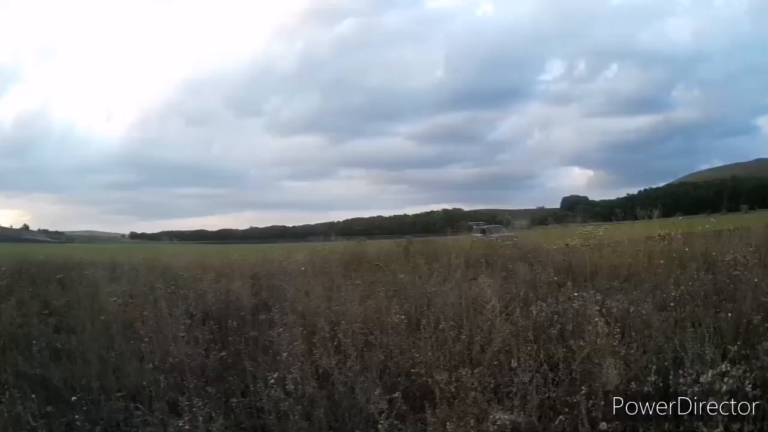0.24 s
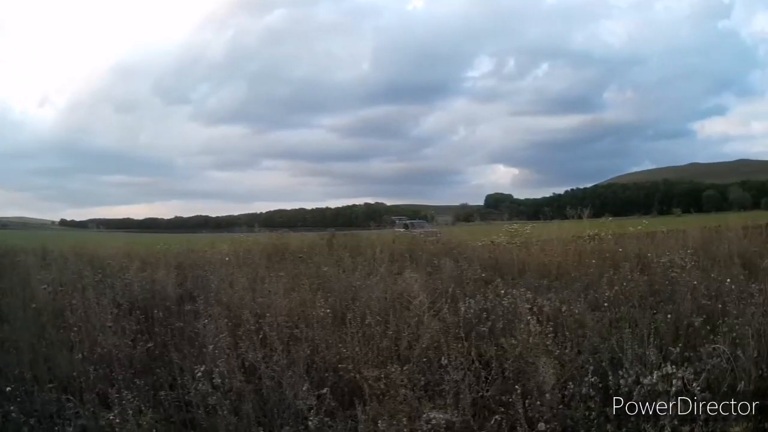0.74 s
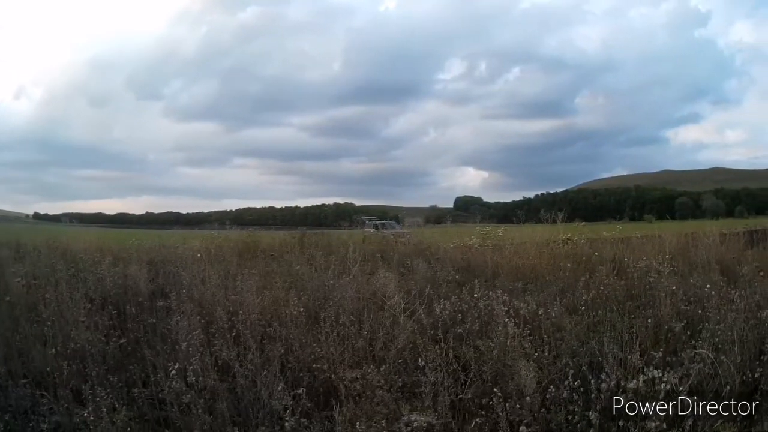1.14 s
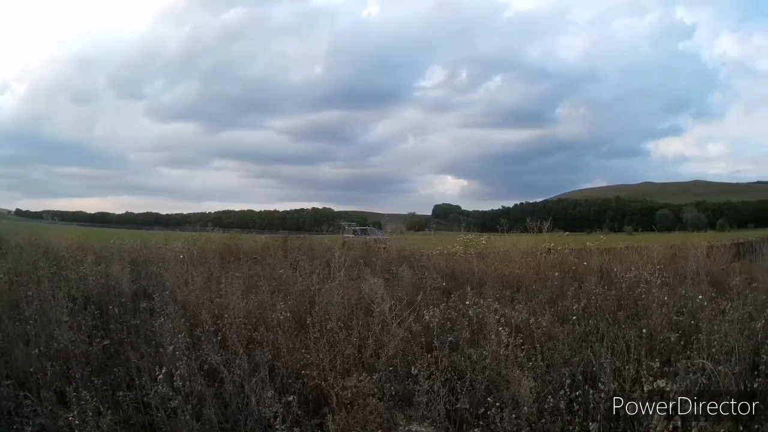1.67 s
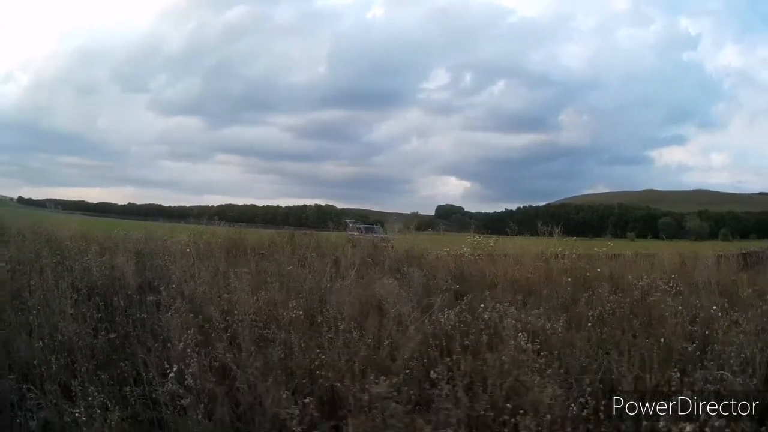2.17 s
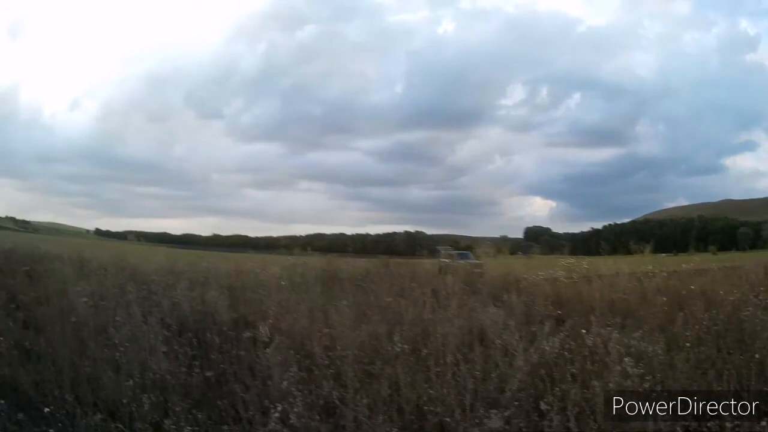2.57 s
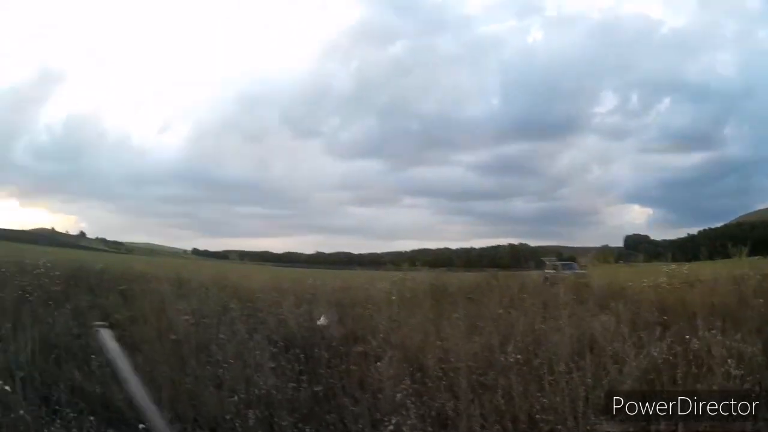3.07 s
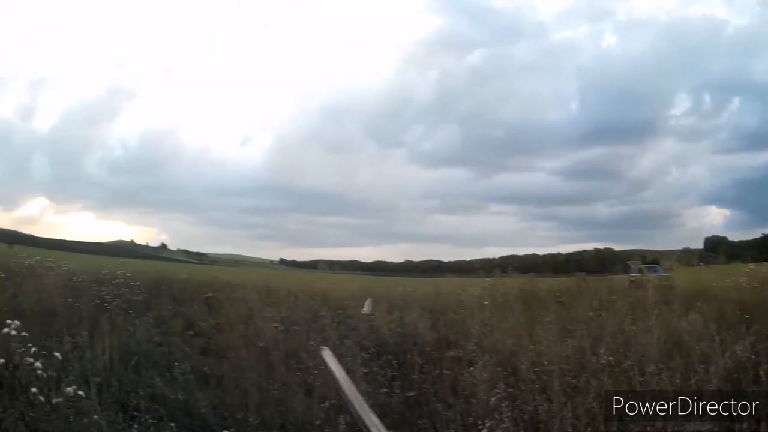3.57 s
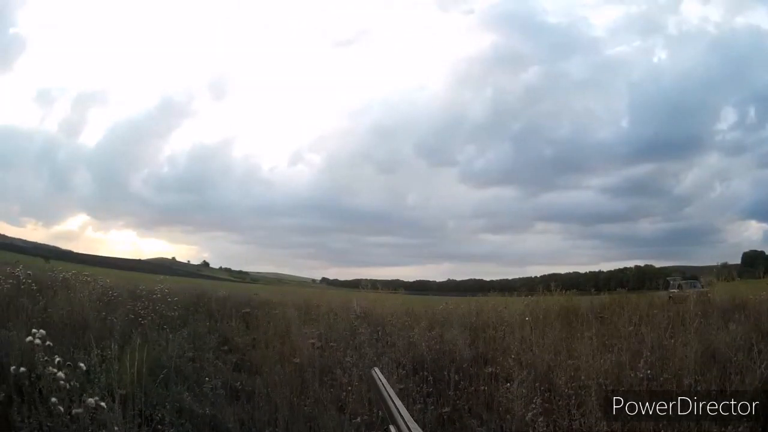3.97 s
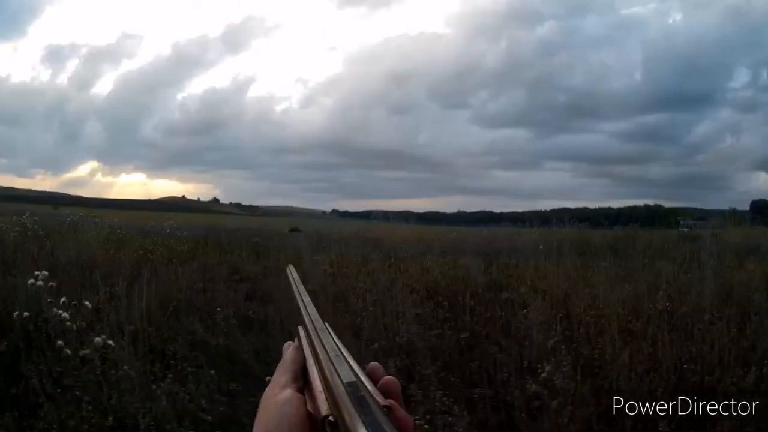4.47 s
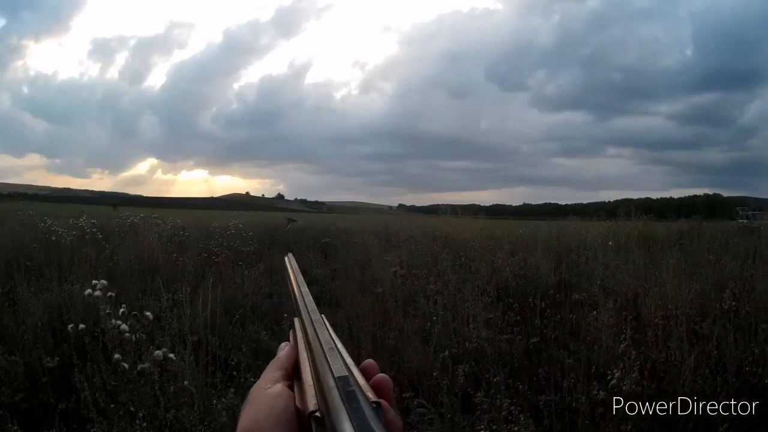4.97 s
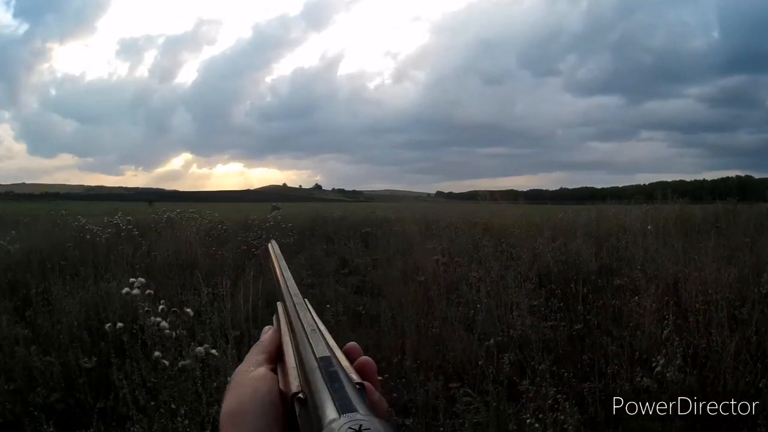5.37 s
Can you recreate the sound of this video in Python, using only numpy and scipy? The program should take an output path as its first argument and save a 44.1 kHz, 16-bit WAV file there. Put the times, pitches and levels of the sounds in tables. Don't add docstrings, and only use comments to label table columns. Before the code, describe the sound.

Muffled wind booms inside a sealed camera case in a meadow, with small strap ticks, cloth rubs and blunt knocks as a gun is raised.

```python
import sys
import numpy as np
from scipy import signal
from scipy.fft import rfft, irfft
from scipy.io import wavfile
from scipy.ndimage import uniform_filter1d, map_coordinates

SR = 44100
rng = np.random.default_rng(int(sys.argv[2]) if len(sys.argv) > 2 else 0)


def digitize_waveform(pressure):
    field = np.atleast_2d(pressure).T
    bounded = np.clip(field, -1, 1)
    quanta = np.round(bounded * 32767).astype(np.int16)
    wavfile.write(sys.argv[1], SR, quanta)


def ratio_of_db(decibels):
    return 10 ** (np.asarray(decibels, float) / 20)


N = 247842
TIME_S = np.arange(N) / SR
FFT_LEN = 6 * SR


def unit(x):
    return x / np.sqrt(np.mean(x ** 2) + 1e-20)


def along(points, hz):
    point_hz, gain_db = np.transpose(points)
    return ratio_of_db(np.interp(np.log(hz + 1), np.log(point_hz + 1), gain_db))


def curves(rows):
    at_s, *columns = np.transpose(rows)
    return [np.interp(TIME_S, at_s, column) for column in columns]


def wobble(rate_hz):
    knots = rng.standard_normal(int(N * rate_hz / SR) + 4)
    return map_coordinates(knots, [np.arange(N) * rate_hz / SR])


def bumps(rows, width_s):
    return sum(height * np.exp(-.5 * ((TIME_S - s) / width_s) ** 2) for s, height in rows)


def filtered(x, response):
    return irfft(rfft(x, FFT_LEN) * response(np.fft.rfftfreq(FFT_LEN, 1 / SR)), FFT_LEN)[:N]


def modes(table):
    def response(f):
        total = 0
        for k, (hz, width_hz, db) in enumerate(table):
            damping = 1j * f * width_hz
            total = total + (-1) ** k * ratio_of_db(db) * damping / (hz * hz - f * f + damping)
        return total
    return response


def noise(spectrum):
    return unit(filtered(rng.standard_normal(N), lambda hz: along(spectrum, hz)))


def scuffs(rate_hz, spread_db, smooth):
    hit, size, sign = rng.random((3, N))
    size_gain = ratio_of_db(-spread_db * np.log(size + 0.00049))
    grains = (hit < rate_hz / SR) * size_gain * np.sign(sign - .5)
    return unit(grains) + smooth * rng.standard_normal(N)


def evened(x, span_s, share):
    span = int(span_s * SR)
    power = np.abs(uniform_filter1d(uniform_filter1d(x ** 2, span), span)) + 1e-20
    return unit(x / power ** (np.clip(share, 0, 1) / 2))


# freq_hz, density_db_per_hz
OPEN_AIR_SPECTRUM = [(15, -40), (45, -15), (150, -9), (250, -7), (460, -5), (600, -4.5), (715, -3.5),
                     (850, -4), (1250, -6), (1780, -15), (1980, -26), (2300, -22.5), (6000, -38.5),
                     (11500, -41), (15700, -48.5)]
# time_s, level_db
GRASS_LEVEL = [(0.0, -43), (0.036, -40.5), (0.14, -44.5), (0.15, -39.5), (0.166, -44), (0.188, -40.5),
               (0.206, -46), (0.215, -38.5)]
# start_s, level_db, pitch_hz
STALK_SNAPS = [
    (.097, -72, 4500),
    (0.129, -47, 4300),
    (0.059, -57, 9230),
]
# freq_hz, width_hz, level_db
INSECT_SONG = [(11830, 82, -84.5)]


def open_air():
    air = ratio_of_db(curves(GRASS_LEVEL)[0] + wobble(110)) * noise(OPEN_AIR_SPECTRUM)
    for hz, width_hz, db in INSECT_SONG:
        song = unit(filtered(rng.standard_normal(N), modes([(hz, width_hz, 0)])))
        air += ratio_of_db(db + 3.2 * wobble(39)) * song
    for start_s, db, hz in STALK_SNAPS:
        t = np.maximum(TIME_S - start_s, 0)
        rough_phase = 0.51 * rng.standard_normal(N)
        air += ratio_of_db(db - 60 * t / 0.015) * np.sin(2 * np.pi * hz * t + rough_phase) * (t > 0)
    return air


# time_s, drag_db, dryness_db
HANDLING_CURVE = [(0.22, -65.5, 7), (0.6, -61.5, 3.5), (1.2, -64.5, 3.5), (1.92, -60.5, -4.5),
                  (2.2, -65, 1), (2.45, -60, 3), (2.74, -60, 0.5), (2.83, -55.5, -3), (2.99, -51.5, -6.5),
                  (3.26, -57.5, -3), (3.42, -53.5, 0), (3.55, -49.5, -7), (3.63, -53.5, 4),
                  (3.74, -54.5, 3), (3.82, -62, 4.5), (4.4, -62.5, 3), (5.06, -72.5, 10.5),
                  (5.62, -65, 9.5)]
REST_DB = -60


def handling():
    drag_db, dry_db = curves(HANDLING_CURVE)
    return drag_db - REST_DB, dry_db


# freq_hz, density_db_per_hz
HISS_SPECTRUM = [(400, -18.5), (700, -10), (1000, -6.5), (1600, -8), (2500, -11), (3300, -11), (3800, -13),
                 (4000, -16.5)]
# freq_hz, level_db
WHINE_TONES = [(2977, -88)]
HISS_DB, HISS_DB_PER_CLOTH_DB = -65.5, .25


def electronics():
    whine = 0
    for hz, db in WHINE_TONES:
        whine = whine + ratio_of_db(db + 3) * np.sin(2 * np.pi * hz * TIME_S + 1.2 * wobble(20))
    drag_db, dry_db = handling()
    cloth_db = HISS_DB_PER_CLOTH_DB * np.maximum(drag_db + 1.5 * dry_db + 0.5, 0)
    return ratio_of_db(HISS_DB + cloth_db + 0.69 * wobble(40)) * noise(HISS_SPECTRUM) + whine


# freq_hz, density_db_per_hz
HEAVE_SPECTRUM = [(30, -33.5), (70, 1.5), (120, -1), (170, -3), (260, -44.5)]
# time_s, gain_db
CASE_PUSHES = [(.4, 10), (.65, 5), (.9, 5.5), (1.45, 3), (1.72, 4.5), (1.99, -3), (2.81, 4.5), (3.0, 9.5),
               (3.15, 9), (3.56, 0), (3.68, 11), (5.51, -3.5)]
PUSH_S = .04
HEAVE_DB, HEAVE_DB_PER_DRAG_DB = -57.5, 1.1


def heave():
    drag_db, _ = handling()
    level_db = HEAVE_DB + HEAVE_DB_PER_DRAG_DB * drag_db + 0.89 * bumps(CASE_PUSHES, PUSH_S)
    return ratio_of_db(level_db) * evened(noise(HEAVE_SPECTRUM), span_s=.04, share=0.5)


# time_s, level_db
WIND_STRENGTH = [(0.22, -36), (0.31, -38.5), (0.35, -43.5), (0.41, -36.5), (0.6, -38.5), (0.7, -38),
                 (0.73, -37.5), (1.35, -38.5), (1.38, -38.5), (1.95, -39.5), (1.98, -36.5), (3.06, -41.5),
                 (3.14, -34), (3.17, -40), (3.56, -36.5), (3.94, -43), (4.76, -43), (5.62, -42.5)]
# time_s, gain_db
EDDY_SURGES = [(.44, 4), (.51, 1.5), (.7, 1.5), (1.07, 2.5), (1.16, -2.5), (1.33, -4.5), (1.44, 6.5),
               (1.62, -0.5), (1.78, 2), (1.93, -8.5), (2.0, 1), (2.34, 1), (2.58, 3.5), (2.63, -3.5),
               (2.75, 0.5), (3.08, 1.5), (3.32, 4), (3.46, 3.5), (3.62, 2), (4.2, -0.5), (4.59, 5),
               (4.87, 5), (5.15, 4)]
# freq_hz, width_hz, gain_db
CAVITY_LOW = [(168.6, 50.5, -3.5), (246.9, 36.3, 2.5)]
# freq_hz, width_hz, gain_db
CAVITY_HIGH = [(315.2, 69, 5), (413, 94, -5.5)]
# freq_hz, width_hz, gain_db
PORT_MODE = [(442, 110, 0)]
# freq_hz, density_db_per_hz
BUFFET_SPECTRUM = [(8, -20), (30, -7.5), (55, -6), (110, -7), (170, -19), (300, -54)]
# rest_db, db_per_drag_db
AIR_DRAG = [(-50, 1.6948), (-67, 2.59), (-61, 1.16)]
SURGE_S, WANDER_DB, EDDY_DB = 0.014, 1.5, 1.5
TURN_S, TURN_TAKES_S = 2.6, 1.2
UPPER_DB, UPPER_FACING_DB = -16, 9
PORT_DB, PORT_FACING_DB = -37.5, 20.5
BUFFET_DB, BUFFET_FACING_DB = -11.5, 1.5


def wind():
    boom_db, drag_db = curves(WIND_STRENGTH)[0], handling()[0]
    facing = np.clip((TIME_S - TURN_S) / TURN_TAKES_S, 0, 1)

    def walled(table):
        return lambda f: modes(table)(f) / (1 + 1j * f / 420) ** 4

    air = rng.standard_normal(N)
    eddies = 0
    for k, mode in enumerate(CAVITY_LOW):
        eddies = eddies + (-1) ** k * ratio_of_db(WANDER_DB * wobble(10)) * filtered(air, walled([mode]))
    boom = evened(eddies, span_s=0.029, share=0.68) * ratio_of_db(bumps(EDDY_SURGES, SURGE_S))

    upper = filtered(scuffs(300, spread_db=3.0, smooth=0.92), walled(CAVITY_HIGH))
    upper = evened(upper, span_s=0.026, share=.8)
    port = filtered(scuffs(300, spread_db=3.5, smooth=1.3), lambda f: modes(PORT_MODE)(f) ** 2)
    port = evened(port, span_s=0.088, share=.6)
    buffet = evened(noise(BUFFET_SPECTRUM), span_s=0.059, share=1.0)
    buffet = buffet * ratio_of_db(0.23 * bumps(CASE_PUSHES, PUSH_S))

    out = ratio_of_db(boom_db + EDDY_DB * wobble(14)) * boom
    blown = ((UPPER_DB, UPPER_FACING_DB), (PORT_DB, PORT_FACING_DB), (BUFFET_DB, BUFFET_FACING_DB))
    for layer, (db, facing_db), (rest_db, db_per_drag_db) in zip((upper, port, buffet), blown, AIR_DRAG):
        from_wind = ratio_of_db(boom_db + db + facing_db * facing)
        from_drag = ratio_of_db(rest_db + db_per_drag_db * drag_db)
        out = out + np.hypot(from_wind, from_drag) * ratio_of_db(EDDY_DB * wobble(12)) * layer
    return out


CREAK_S, CREAK_LASTS_S, CREAK_HZ, CREAK_RISE_HZ_PER_S = 1.372, .11, 558, 220
CREAK_DB, CREAK_SWELL_DB_PER_S = -56, 54


def creak():
    t = TIME_S - CREAK_S
    gate = np.clip(np.minimum(t, CREAK_LASTS_S - t) / .015, 0, 1)
    held_s = np.clip(t, 0, CREAK_LASTS_S)
    hz = CREAK_HZ + CREAK_RISE_HZ_PER_S * held_s
    level_db = CREAK_DB + CREAK_SWELL_DB_PER_S * held_s + 0.5 * wobble(39.15)
    return gate * ratio_of_db(level_db) * np.sin(2 * np.pi * np.cumsum(hz) / SR)


# freq_hz, width_hz, gain_db
WALL_LOW = [(564, 59, 3), (720.5, 170, 1.5)]
# freq_hz, width_hz, gain_db
WALL_MIDDLE = [(892, 170, 0)]
# freq_hz, width_hz, gain_db
WALL_HIGH = [(1092, 260, 1), (1315, 340, -2), (2000, 420, -7)]
# rest_db, db_per_drag_db, db_per_dryness_db
WALL_DRAG = [(-60.5, 1.2, 0), (-69, 1.65, .6), (-72.5, 1.86, 1.1)]


def rubbing():
    lumps, out = ratio_of_db(1.5 * wobble(45)), 0
    drag_db, dry_db = handling()
    for (rest_db, per_drag, per_dry), table in zip(WALL_DRAG, (WALL_LOW, WALL_MIDDLE, WALL_HIGH)):
        grains = lumps * scuffs(500, spread_db=1.95, smooth=1.2)
        rub = evened(filtered(grains, lambda f: modes(table)(f) ** 2), span_s=0.21, share=0.16)
        out = out + ratio_of_db(rest_db + per_drag * drag_db + per_dry * dry_db) * rub
    return out


# time_s, level_db
CLOTH_SLIPS = [(0.409, -64.5), (.45, -64), (0.587, -61.5), (.7, -65), (.76, -70.5), (1.02, -64),
               (2.362, -60.5), (2.61, -67), (3.641, -60), (4.108, -62.5), (4.44, -72), (5.412, -74.5),
               (5.61, -59)]
RUSTLE_S = 0.021


def rustles():
    def bright_wall(f):
        return modes(WALL_HIGH)(f) ** 2 * ratio_of_db(7.2 * np.log2(f / 1200 + .1))

    slips = bumps([(s, ratio_of_db(db)) for s, db in CLOTH_SLIPS], RUSTLE_S)
    return slips * unit(filtered(scuffs(900, spread_db=1.0, smooth=0.95), bright_wall))


# start_s, nominal peak_db, nominal
# pitch_hz (sounds 1.23 times higher)
CASE_JOLTS = [(1.435, -34.5, 238), (1.649, -27.5, 225), (2.994, -24.5, 310), (3.069, -29.5, 358),
              (3.456, -20, 261.6), (3.502, -24, 319), (3.537, -14.5, 245.4), (4.235, -22.5, 222.4),
              (4.2345, -33.5, 438), (4.585, -32, 199), (3.571, -24, 261.6), (5.6138, -30, 200)]


def jolts():
    out = np.zeros(N + SR)
    t = np.arange(SR // 20) / SR
    from_peak_s = t - .004
    for start_s, db, hz in CASE_JOLTS:
        push = ratio_of_db(db - 5.0 - 34 * (from_peak_s / 0.0055) ** 2)
        out[round(start_s * SR):][:len(t)] -= push * np.cos(2 * np.pi * 1.23 * hz * from_peak_s)
    return out[:N]


# start_s, peak_db, ring_hz, thud_db
WAIT_TICKS = [(0.28, -40.5, 970, -3), (0.397, -50.5, 765, 5), (0.567, -52.5, 845, 7.5),
              (1.02, -56.5, 1093, -1), (1.124, -51.5, 880, -14), (1.469, -51, 760, -9),
              (1.659, -52.5, 766, -6), (1.819, -48.5, 920, -4), (2.015, -56, 906, 14),
              (2.044, -49.5, 767, -1), (2.225, -52, 920, -8.5), (2.255, -48.5, 767, 2),
              (2.342, -46.5, 890, 5.5), (2.358, -38, 936, -1.5), (2.711, -56, 851, 10),
              (3.277, -40.5, 1030, -14), (3.748, -46, 1160, -6), (4.02, -48.5, 774, -6),
              (4.098, -43.5, 1005, -12), (4.124, -48, 880, -10.5), (4.137, -57.5, 1516, -16),
              (4.234, -45, 916, 12), (4.429, -52, 894, -6), (4.442, -50.5, 820, -1), (4.745, -45, 780, -6),
              (5.408, -51, 1240, -24), (5.583, -43, 850, 4), (5.6096, -47.5, 1470, -14)]
# start_s, peak_db, ring_hz, thud_db
GUN_TICKS = [(2.982, -36.5, 910, -3), (2.991, -28, 875, 2.5), (3.029, -48.5, 760, -3),
             (3.311, -65.5, 920, 0), (3.346, -75, 780, 0), (3.404, -41, 970, -2), (3.444, -41.5, 930, 8.5),
             (3.489, -37.5, 930, -12), (3.526, -52, 1040, 24.5), (3.546, -32, 962, 2),
             (3.559, -50, 855, 10.5), (3.6, -35.5, 908, 5.5), (3.645, -41.5, 912, 3), (3.686, -44, 958, 2),
             (3.699, -45, 1147, -23)]
SNAP_LAGS = 0.78


def ticks(rows, contact_s, snap_db, rattle_db):
    out = np.zeros(N + SR)
    t = np.arange(SR // 10) / SR

    def band(lo_hz, hi_hz):
        sos = signal.butter(N=3, Wn=[lo_hz, hi_hz], btype="band", fs=SR, output="sos")
        raw = rng.standard_normal((len(rows), len(t) + 500))
        return unit(signal.sosfilt(sos, raw)[:, 500:])

    u = t / contact_s
    contact = np.e * u * np.exp(-u)
    ring_envelope = ratio_of_db(2.5 - 60 * u / 14) * (1 - np.exp(-2 * u))
    bands = band(800, 1350), band(1800, 3200), band(500, 630)
    for (start_s, db, hz, thud_db), rattle, snap, thud in zip(rows, *bands):
        ring = ring_envelope * np.sin(2 * np.pi * hz * t)
        burst = ratio_of_db(rattle_db) * rattle + ratio_of_db(thud_db - 6.5) * thud
        burst = burst + ratio_of_db(snap_db - SNAP_LAGS * (db + 55) - 10.5) * snap
        out[round(start_s * SR):][:len(t)] += ratio_of_db(db - 3.0) * (ring + contact * burst)
    return out[:N]


# freq_hz, gain_db
RESAMPLER_GAIN = [(3000, 0.5), (4000, -3.5), (5000, -11.5), (5500, -18.5), (6200, -30.5), (7000, -50),
                  (7600, -97), (8400, -99), (9500, -38), (11000, -28.5), (12000, -25), (13000, -32),
                  (14500, -48.5), (15500, -84.5)]
CASE_RATE_HZ = 8000


def low_rate(x):
    z, period = rfft(x, FFT_LEN), FFT_LEN * CASE_RATE_HZ // SR
    k = np.arange(len(z)) % period
    folded = np.where(k > period // 2, np.conj(z[period - k]), z[k])
    return irfft(folded * along(RESAMPLER_GAIN, np.fft.rfftfreq(FFT_LEN, 1 / SR)), FFT_LEN)[:N]


CUT_S, CUT_TAKES_S = .2168, .003


def scene():
    taps = ticks(WAIT_TICKS, contact_s=0.0036, snap_db=-3, rattle_db=-11)
    taps = taps + ticks(GUN_TICKS, contact_s=.005, snap_db=-15.5, rattle_db=-17)
    air = electronics() + heave() + wind()
    shell = creak() + rubbing() + rustles() + jolts() + taps
    cased = low_rate(air + shell)
    fade = np.sin(np.pi / 2 * np.clip((TIME_S - CUT_S) / CUT_TAKES_S + .5, 0, 1)) ** 2
    return ((1 - fade) * open_air() + fade * cased)[None]


def low_pass(x):
    return signal.sosfilt(signal.butter(12, 15700, fs=SR, output="sos"), x)


CONVERTER_DB = -99


def record(dry):
    grain = ratio_of_db(CONVERTER_DB) * rng.standard_normal(dry.shape)
    return low_pass(dry + grain)


dry = scene()
out = record(dry)
digitize_waveform(out)
```